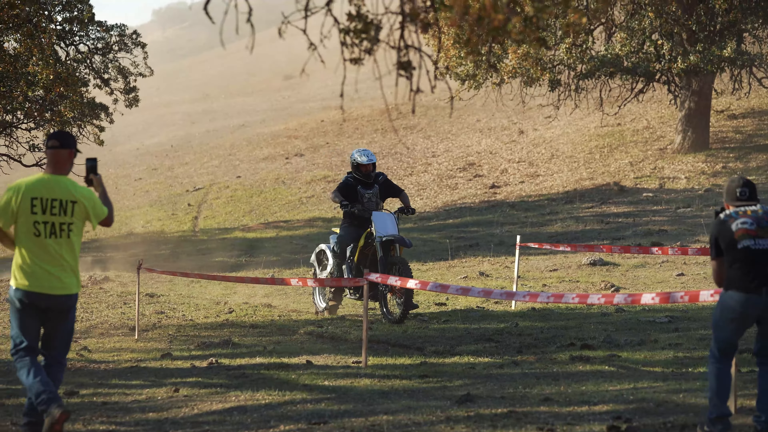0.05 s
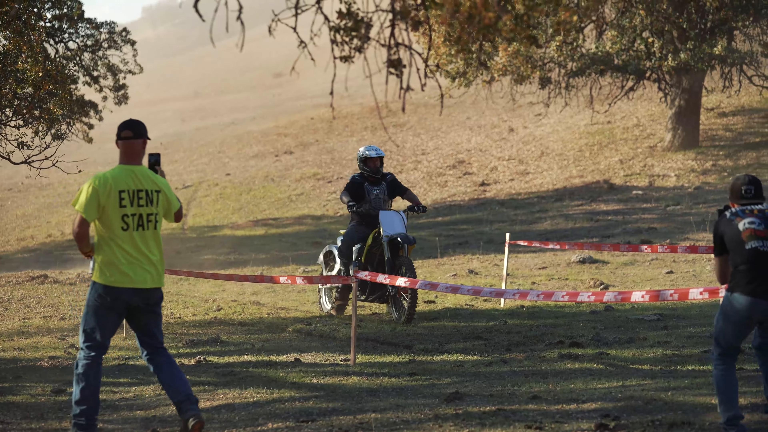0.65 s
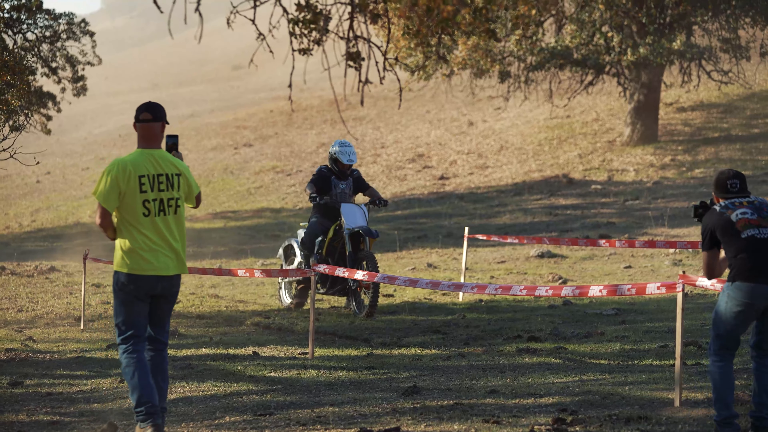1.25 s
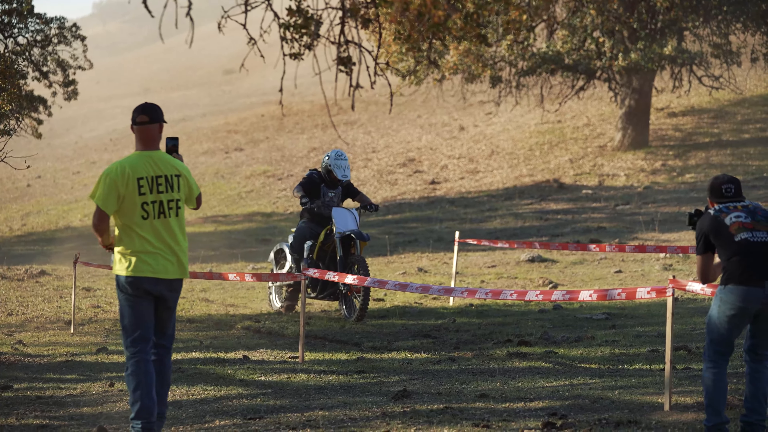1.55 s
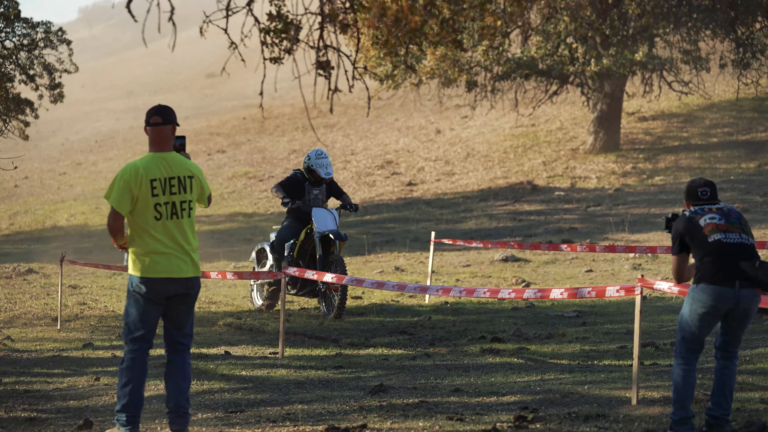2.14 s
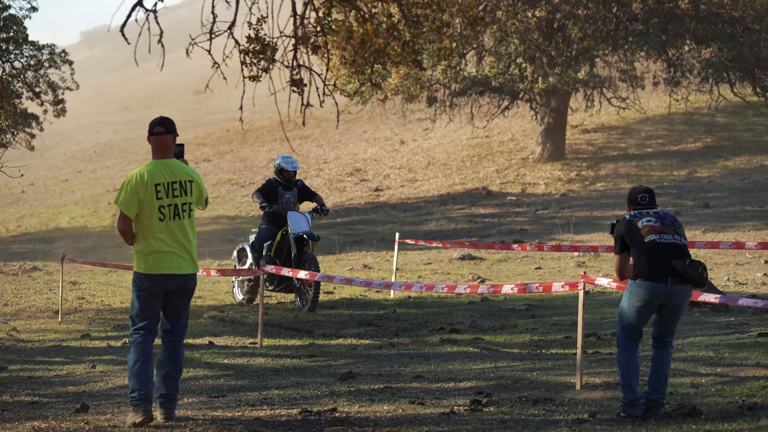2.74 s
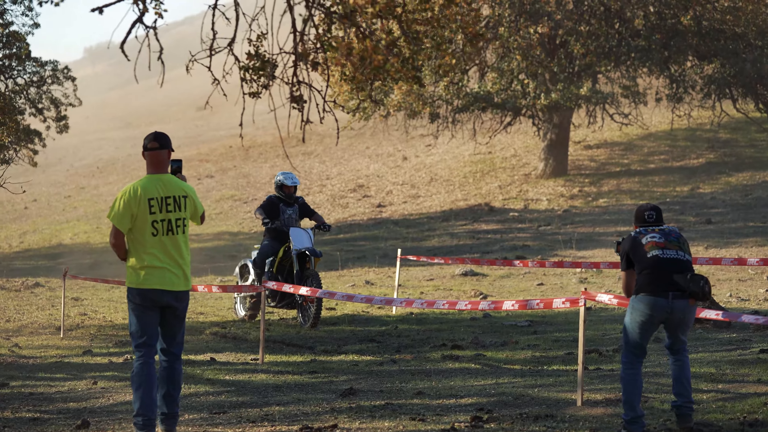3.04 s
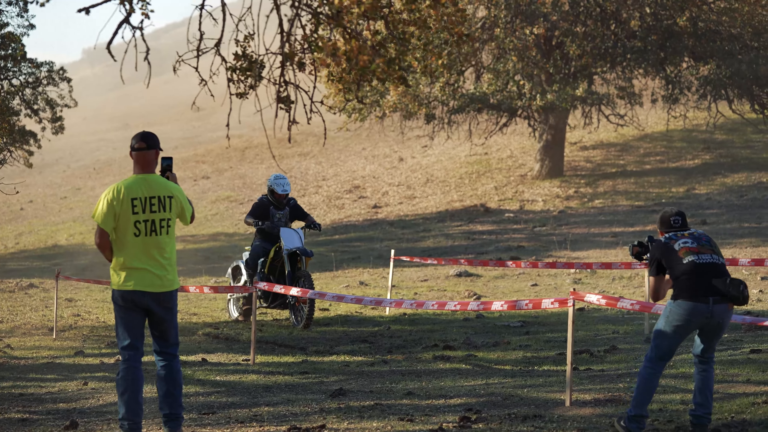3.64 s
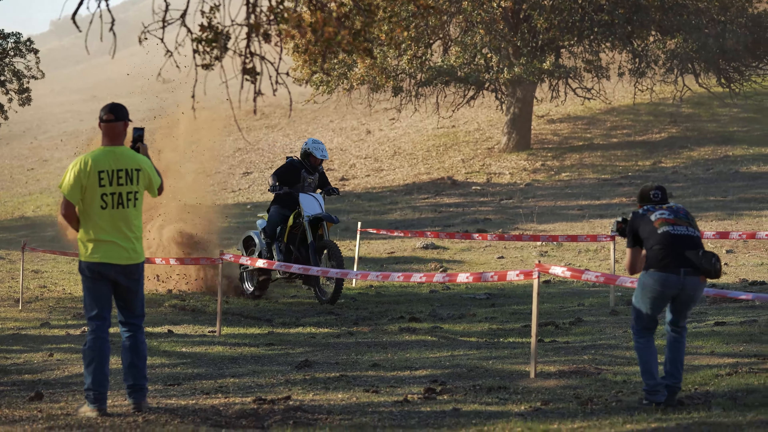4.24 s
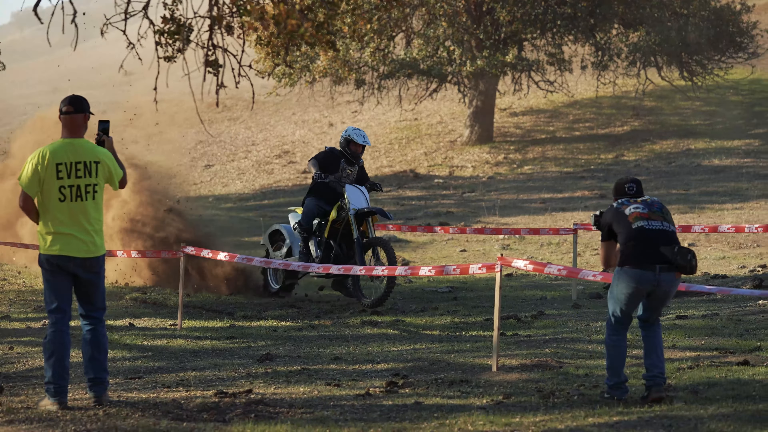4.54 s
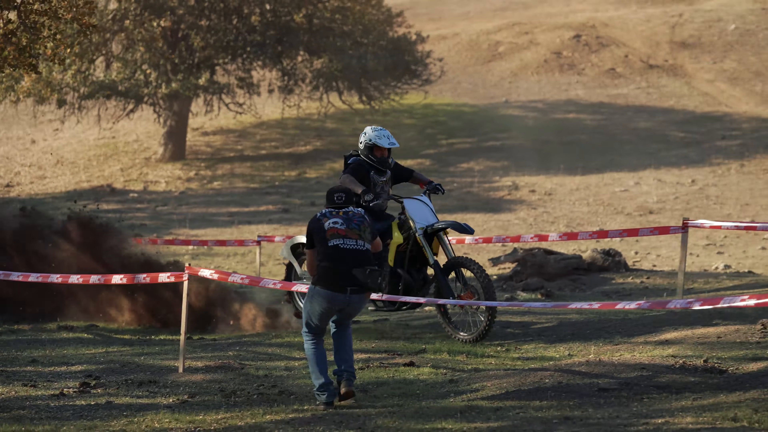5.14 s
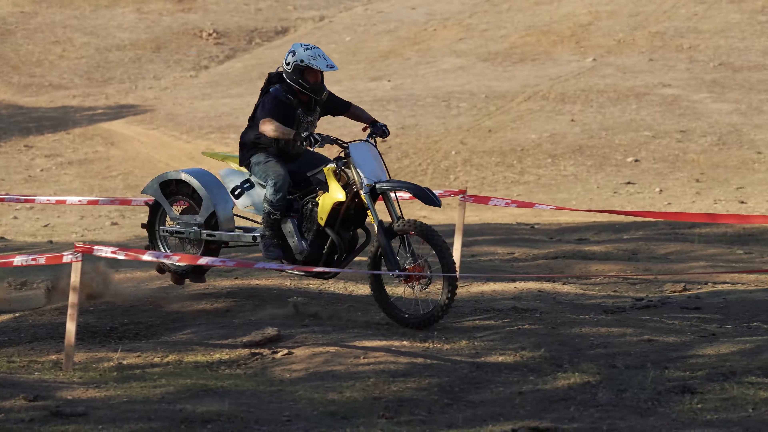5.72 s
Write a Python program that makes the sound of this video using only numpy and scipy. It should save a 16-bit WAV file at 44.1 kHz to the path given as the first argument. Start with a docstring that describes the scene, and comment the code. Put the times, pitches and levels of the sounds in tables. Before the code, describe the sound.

An off-road motorcycle putters outdoors, gives two quick revs, accelerates with a harsh blare and hiss of dirt, then slows nearby.

```python
"""A four-cylinder hill-climb motorcycle idles unevenly on an open hillside, its exhaust droning and puttering.
Two quick twists of the throttle rev it up: each firing blares and cracks out of the open pipe,
and unburnt fuel pops as it slows. Then it launches at full throttle, the rear wheel spinning
and spraying dirt. Last, the throttle shuts and it coasts up close, clattering and popping.
Ground and trees scatter the sound all along."""
import sys
import numpy as np
from scipy import signal
from scipy.fft import rfft, irfft
from scipy.io import wavfile
from scipy.ndimage import uniform_filter1d, map_coordinates

SR = 44100
rng = np.random.default_rng(int(sys.argv[2]) if len(sys.argv) > 2 else 0)


def dump_mix(stems):
    """Bounce the given channels to the path in sys.argv[1] as a 16-bit WAV at rate SR."""
    frames = np.atleast_2d(stems).T  # one column per channel
    limited = np.clip(frames, -1, 1)  # hard clip at full scale
    pcm = np.round(limited * 32767).astype(np.int16)
    wavfile.write(sys.argv[1], SR, pcm)


N = 259308
TIME = np.arange(N) / SR


def gain_of(db):
    """Turns decibels into a number to multiply by."""
    return 10 ** (np.asarray(db) / 20)


def curves(table, at=TIME):
    """Looks up `at` in a table's first column and gives a curve for each other column."""
    key, *columns = np.transpose(table)
    return np.array([np.interp(at, key, column) for column in columns])


def at_pitch(table, hz):
    """Looks up frequencies in a table, joining its rows on a log axis."""
    f, value = np.transpose(table)
    return np.interp(np.log(hz + 1), np.log(f + 1), value)


def steadied(x, size=2600):
    """Holds the average level at 1 and leaves the fast detail alone."""
    power = np.atleast_2d(x ** 2).mean(0)
    return x / np.sqrt(abs(uniform_filter1d(uniform_filter1d(power, size), size)) + 1e-14)


def wobble(rate_hz):
    """A random wavy line, typically about 1 away from zero."""
    count = N // 8
    return np.interp(TIME * rate_hz, np.arange(count), rng.standard_normal(count)) / np.sqrt(2 / 3)


def clicks(times, sizes):
    """Clean clicks at exact times, even between samples."""
    place = np.asarray(times)[:, None] * SR
    at = np.floor(place).astype(int) + np.arange(-7, 9)
    shape = np.sinc(at - place) * np.cos(np.pi * (at - place) / 16) ** 2
    return np.bincount(np.clip(at, 0, N - 1).ravel(), (shape * sizes[:, None]).ravel(), N)


def puffs(times, sizes, decay_s):
    """A burst of swirling gas after each pulse, with as much energy as the pulse."""
    keep = np.exp(-2 / (decay_s * SR))
    energy = np.bincount(np.clip(times * SR, 0, N - 1).astype(int), sizes ** 2, N)
    return np.sqrt(signal.lfilter([1 - keep], [1, -keep], energy)) * rng.standard_normal(N)


def resonate(x, hz, width_hz):
    """Lets through a band of sound around the moving pitch hz."""
    spin = np.exp(2j * np.pi * np.cumsum(hz) / SR)
    keep = np.exp(-np.pi * width_hz / SR)
    return 2 * (spin * signal.lfilter([1 - keep], [1, -keep], x / spin)).real


# narrow bands that the pipe boosts or cuts: f/Hz, width/Hz, boost/dB
PIPE_RINGS = [(1038.8, 64, 3.5), (1187, 23, 3.5), (1413, 88, -3), (1834, 220, 1), (1979, 156, 3),
              (2204, 110, -1), (2382.5, 113, 3.5), (2750, 160, 0), (3344, 235, 3.5), (3871, 154, -5),
              (4296, 252, 5.5), (4525, 198, -12), (4788, 360, 5), (5696, 158, 1.5), (6260, 130, 1.5),
              (6678, 200, 6.5), (6856, 184, -8), (7238, 218, 3.5), (7490, 160, -3.5)]
# their drift as the gas heats and cools: t/s, pitch change/share
PIPE_DRIFT = [(0, -0.014), (1.4, -0.0156), (1.58, 0.0256), (2.2, -0.0012), (2.8, 0.0166), (3.1, -0.0013),
              (3.7, 0.0087), (4.3, -0.00039), (5.2, 0.0056), (5.88, -0.00046)]
def pipe(x, colour, size=4096):
    """The exhaust pipe gives a sound a broad tone colour and narrow, drifting rings."""
    hz = abs(np.fft.fftfreq(size, 1 / SR))
    rings_db = sum(boost / (1 + (2 * (hz - f) / width) ** 2) for f, width, boost in PIPE_RINGS)
    log_gain = np.log(gain_of(at_pitch(colour, hz) + rings_db))
    response = np.fft.ifft(np.exp(signal.hilbert(log_gain).conj())).real  # rings only after a pulse
    clock = np.cumsum(1 + curves(PIPE_DRIFT)[0])  # stretching time moves all the rings together
    stretched = map_coordinates(x, [np.interp(np.arange(clock[-1]), clock, np.arange(N))], order=3)
    return map_coordinates(signal.oaconvolve(stretched, response[:size // 2]), [clock], order=3)


# how long echoes take to fade by 60 dB (below zero they grow): f/Hz, t/s
ECHO_FADE = [(200, -1.94), (2000, 4), (6000, 0.4446), (14000, -0.47)]
# tone colour of the echoes: f/Hz, level/dB
ECHO_COLOUR = [(100, -14), (500, -10.5), (1000, -8.5), (2000, -8.5), (4000, -3.5), (8000, -2.5),
               (14000, -5)]
def hillside(x, wet_db):
    """Adds a short spray of echoes from ground and trees, different at each ear."""
    count, gap = 600, 25  # echoes, and samples between them
    taps = np.zeros((2, SR // 2))
    at = gap + gap * np.arange(count) + rng.integers(0, gap, (2, count))
    np.put_along_axis(taps, at, rng.choice([-1., 1.], at.shape), 1)
    hz, t, bands = signal.stft(taps, SR, nperseg=256)
    decay = gain_of(-60 * t / at_pitch(ECHO_FADE, hz)[:, None])
    decay /= np.sqrt((decay ** 2).sum(1, keepdims=True) * 128 / gap)
    colour = gain_of(at_pitch(ECHO_COLOUR, hz) + wet_db)[:, None]
    tail = signal.istft(bands * decay * colour, SR, nperseg=256)[1]
    return x + signal.fftconvolve(x[None], tail, axes=1)[:, :N]


# engine speed through idle, two revs, launch, wheelspin and coasting: t/s, crank speed/Hz
CRANK_SPEED = [(0, 55.66), (.8, 60.16), (1.42, 57.97), (1.45, 73.9), (1.5, 98.3), (1.58, 158.1),
               (1.62, 138.7), (1.8, 111.77), (2.0, 79.9), (2.2, 64.7), (2.4, 60.4), (2.65, 60.47),
               (2.985, 60.2), (3.04, 73.1), (3.115, 88.3), (3.18, 79.3), (3.305, 69.6), (3.4, 98.25),
               (3.5, 121.8), (3.7, 156.3), (3.77, 167.2), (3.84, 112.5), (3.868, 94.1), (3.92, 105.6),
               (4.03, 119.8), (4.1, 134.7), (4.2, 143.9), (4.3, 148), (4.39, 152.2), (4.44, 160),
               (4.51, 140.6), (4.6, 152.7), (4.63, 143), (4.72, 151.2), (4.79, 171.2), (4.83, 147.2),
               (4.89, 156.3), (4.93, 144.2), (5.0, 155.9), (5.05, 134.7), (5.09, 144.5), (5.17, 154),
               (5.21, 133.2), (5.255, 111), (5.315, 109.2), (5.5, 86.4), (5.6, 74.24), (5.68, 72),
               (5.88, 65.73)]
# the rider's hand: t/s, throttle opening/0-1
THROTTLE_OPENING = [(1.42, 0.18), (1.455, 0.72), (1.55, 1), (1.6, 0), (2.97, 0.18), (3.02, 0.5),
                    (3.115, 0.5), (3.14, 0.04), (3.31, 0.07), (3.34, 0.58), (3.62, 0.6), (3.7, 0.69),
                    (3.87, 0.83), (3.95, 0.93), (5.18, 0.99), (5.26, 0.03)]
def engine(flutter=.004):
    """Speed, throttle and turns so far of the crank, the main shaft, which never spins quite evenly."""
    crank_hz = curves(CRANK_SPEED)[0]
    throttle = np.clip(curves(THROTTLE_OPENING)[0], 0, 1)
    turns = np.cumsum(crank_hz * (1 + flutter * wobble(rate_hz=59.99))) / SR
    return crank_hz, throttle, turns


def nearness(nearest_s=5.946, width_s=0.167):
    """How near a passing thing is, 0-1; the bike unless other times are given."""
    return 1 / (1 + ((TIME - nearest_s) / width_s) ** 2)


def by_throttle(throttle, shut, half, wide):
    """Blends the values for a shut, half open and wide open throttle."""
    past_half = 2 * throttle - 1
    return half + (shut - half) * np.maximum(-past_half, 0) + (wide - half) * np.maximum(past_half, 0)


# base loudness with the throttle shut, half open (a hollower sound) and wide open:
# crank speed/Hz, firing tone/dB, burble/dB, blare/dB, crack/dB, rush/dB
SHUT_LEVELS = [(59.4, -27, -38.5, -48.5, -61, -74.5), (61.68, -30, -33, -49.5, -57, -67.5),
               (71.29, -26, -30.5, -36, -47.5, -57.5), (72.24, -29, -27, -36, -38, -53.5),
               (80.303, -28, -30.5, -33.5, -36.5, -48), (96.3, -26.5, -32.5, -37.5, -39, -53.5),
               (103.35, -26.5, -30.5, -36, -42, -56.5), (129.9, -22.5, -37, -25.5, -28.5, -45.5)]
HALF_LEVELS = [(64.6, -22.5, -27.5, -43, -55.5, -63), (76.26, -26, -27.5, -33.5, -36.5, -55.5),
               (86.6, -34, -25.5, -35, -44, -59.5), (95.68, -47, -33.5, -34, -33, -47),
               (115.8, -36.5, -37, -29.5, -36, -48), (130.4, -37, -33.5, -27.5, -23, -38.5),
               (143.4, -46.5, -32, -26.5, -24.5, -40.5), (160.1, -21.5, -43.5, -29.5, -25.5, -42)]
WIDE_LEVELS = [(65.77, -19.5, -25.5, -21.5, -30, -60.5), (101, -23.5, -23, -24, -19, -39),
               (125.7, -22, -34.5, -25, -23, -41.5), (153.9, -22, -38, -22.5, -25, -39.5)]
# what nearness adds to the same five voices: boost/dB
NEAR_BOOST = (8.44, 7, 5.3, 1.6, 9.9)
def loudness(crank_hz, throttle):
    """Levels in dB of the five voices, from speed, throttle and nearness."""
    at_speed = [curves(table, crank_hz) for table in (SHUT_LEVELS, HALF_LEVELS, WIDE_LEVELS)]
    levels = by_throttle(throttle, *at_speed) + np.outer(NEAR_BOOST, nearness())
    levels[-1] += 4 * nearness(nearest_s=5.23, width_s=0.46)  # passing dirt lifts the rush
    return levels


# at low speed one burn every few turns is heavy: t/s, swell of the firing tone/share, chuff level/dB
HEAVY_BURNS = [(.067, 1.6, -9), (.129, 1.55, -8), (.203, 1.45, -10), (.269, 1.6, -9.5), (.334, 1.7, -22.5),
               (.378, 1.44, -19), (.443, 0.94, -15.5), (.51, 1.06, -10.5), (.574, 0.98, -9.5),
               (.641, 1.17, -12), (0.706, 0.78, -11), (.774, 1.06, -13), (.845, 0.86, -5.5),
               (.913, 0.95, -8), (.952, 0.86, -20.5), (1.042, 1.14, -11), (1.11, 1.04, -9.5),
               (1.177, 0.86, -10.5), (1.249, 0.77, -8.5), (1.312, 1.04, -12.5), (1.357, 0.94, -15),
               (2.02, 0.49, -3.5), (2.109, 1.305, -7), (2.181, 2.05, -8.5), (2.239, 2.215, -25),
               (2.302, 2.7, -10.5), (2.37, 2, -10.5), (2.443, 0.991, -11), (2.492, 2.1, -18),
               (2.539, 1.34, -19.5), (2.608, 1, -19.5), (2.675, 0.96, -15.5), (2.744, 1.003, -20.5),
               (2.811, 0.849, -18.5), (2.868, 1.002, -11.5), (3.0, 0.7017, -16.5), (5.567, 1.27, -10),
               (5.606, 0.872, -8), (5.64, 0.814, -10.5), (5.669, 1.65, -15), (5.728, 0.88, -17.5),
               (5.791, 1.803, 0.5), (5.868, 1.274, -22)]
def lope(after_s, width_s):
    """The limping beat of the idle: a smooth bump after_s from each heavy burn."""
    t = TIME[::32]
    bumps = sum(swell * np.exp(-((t - s - after_s) / width_s) ** 2 / 2) for s, swell, _ in HEAVY_BURNS)
    return np.interp(TIME, t, bumps)


def lope_gain(db, after_s, width_s):
    """Changes a level by up to db around each heavy burn."""
    return gain_of(db * np.minimum(lope(after_s, width_s), 1))


def tone(turns, order, db, waver_db=3.0):
    """A wavering tone; its order is how many times it swings in one crank turn."""
    level = gain_of(db + waver_db * wobble(45))
    return level * np.sqrt(2) * np.cos(2 * np.pi * (order * turns + rng.random()))


# low pitches at which the pipe likes to ring: f/Hz, level/dB
LOW_RINGS = [(58, -47), (72, -44.5), (81, -35.5), (98, -32), (112, -40), (130, -46), (180, -33.5),
             (240, -38), (275, -30.5), (315, -24.5), (355, -28.5), (415, -37), (560, -45.5)]
# boosts for orders 1, 3 and 4, by throttle: shut/dB, half/dB, wide/dB
ORDER_BOOSTS = [(.5, 0, -1.4), (-9.5, 2, -0.075), (-1.5, 5, 1)]
def drone(turns, crank_hz, throttle, firing_db):
    """The firing tone swells at heavy burns; weaker tones swell as they cross the pipe's low rings."""
    cold_hz = crank_hz / (1 + 0.1108 * np.minimum(2 * throttle, 1))  # hot gas raises the rings
    first, third, fourth = [at_pitch(LOW_RINGS, k * cold_hz) + by_throttle(throttle, *db)
                            for k, db in zip((1, 3, 4), ORDER_BOOSTS)]
    near_db = 3 * nearness()
    levels = first, firing_db, third + near_db, fourth + near_db
    tones = [tone(turns, k, db, waver_db=1.2736) for k, db in enumerate(levels, 1)]
    tones[1] *= steadied(1 + lope(after_s=0, width_s=0.0087), size=4000)
    return sum(tones)


# the four cylinders in firing order: relative level/dB, extra travel time in the pipe/s
FIRING_ORDER = [(0, 0.0003), (-3.5, 0), (-0.5, 0), (-4.5, 0.00147)]
def firings(turns, contrast, spread_db, jitter_s):
    """Times and strengths of the firings, two a crank turn; no two burns are alike."""
    number = np.arange(int(2 * turns[-1]))
    time_luck, size_luck = rng.standard_normal((N // 100, 2))[number].T
    cylinder_db, lag_s = np.take(FIRING_ORDER, number, axis=0, mode="wrap").T
    times = np.interp(number / 2, turns, TIME) + lag_s + jitter_s * time_luck
    return times, gain_of(contrast * cylinder_db + spread_db * np.minimum(size_luck, 2))


# tone colour of the burble: f/Hz, level/dB
BURBLE_COLOUR = [(25, -19), (60, -16), (90, 4.5), (140, -2), (190, -6.5), (250, -5.5), (340, 4.5),
                 (470, -1), (600, -16.5), (900, -18.5), (2000, -53)]
def burble(turns, crank_hz, level_db, suction=0.612, gas=.17, width_s=0.000978):
    """Strong and weak slugs of gas, each followed by suction, thump the pipe's low rings."""
    times, sizes = firings(turns, contrast=0.45, spread_db=.7, jitter_s=.0001)
    uneven = sizes - sizes.mean()
    rebound = times + 0.1423 / np.interp(times, TIME, crank_hz)
    flow = clicks(times, uneven) - suction * clicks(rebound, uneven) + gas * puffs(times, uneven, 0.0059)
    keep = np.exp(-1 / (width_s * SR))
    slugs = signal.lfilter([1 - keep], [1, -keep], flow)
    slugs *= lope_gain(db=-1, after_s=-0.041, width_s=0.014)  # a gulp just before a heavy burn
    return gain_of(level_db) * steadied(hillside(pipe(slugs, BURBLE_COLOUR), wet_db=5.5), size=1600)


def overtones(turns, crank_hz, burble_db, blare_db, load):
    """Higher tones hum low in the pipe at idle and sing raggedly under load; a gear whines thinly."""
    hum = sum(tone(turns + rng.random(), k, burble_db - 15 + at_pitch(BURBLE_COLOUR, k * crank_hz))
              for k in range(5, 12))
    song = 0
    for k in range(5, 21):
        ragged_turns = turns + rng.random() + .55 * wobble(110) / k
        song += tone(ragged_turns, k, blare_db - 4 * (k % 2), waver_db=1.8)  # odd orders are weaker
    whine = tone(turns, order=11, db=-57.5)
    return hum + whine + gain_of(-11) * load ** 2 * brassy(song, width_hz=380)


# tone colour of the blare: f/Hz, level/dB
BLARE_COLOUR = [(300, -47.5), (480, -1.5), (620, -3), (750, -3.5), (900, -7), (1100, -5.5), (1400, -5.5),
                (1750, 2), (2200, -4), (2700, -2.5), (3400, -7), (4500, -22.5), (8000, -32)]
# a bright band that wanders as the bike slides about: t/s, f/Hz, amount added/share
BRIGHT_BAND = [(0, 1030, .5), (.5, 1030, 0.35), (.8, 1950, 0.88), (1.4, 1930, 0.22), (1.54, 1940, 1.05),
               (1.6, 2852, 0.8), (1.7, 2850, 0.44), (2.0, 2010, 0.107), (3.6, 1889, 0.5175),
               (3.78, 3269, 0.324), (3.93, 3307, 0.87), (4.1, 2000, 0.19), (4.35, 2838, 1.4),
               (4.45, 1850, 0.625), (4.6, 1770, 0.705), (4.95, 1712, 0.5966), (5.05, 2518, 1.364),
               (5.2, 2481, 0.38), (5.3, 1902, 0.339)]
# boost or cut of the middle pitches: t/s, level/dB
MIDDLE_BAND = [(0, -7), (.5, 5), (.75, -9.5), (1.2, -14), (1.55, 1.5), (2.5, 8), (3.2, 5.5), (3.9, 4.5),
               (4.2, -3), (4.5, -0.5), (4.8, 2), (5.2, 5), (5.88, 20)]
def brassy(x, width_hz):
    """The pipe's horn-like colour, with a wandering bright band and a changing middle."""
    bright_hz, share = curves(BRIGHT_BAND)
    voice = pipe(x, BLARE_COLOUR)
    middle = (gain_of(curves(MIDDLE_BAND)[0]) - 1) * resonate(voice, hz=np.full(N, 1062), width_hz=724)
    return voice + middle + share * resonate(voice, bright_hz, width_hz)


def blare(turns, level_db, load):
    """The brassy voice of the pipe: loose puffing at idle, firm and ragged pulses under load."""
    times, sizes = firings(turns, contrast=.9, spread_db=2.5, jitter_s=.00003)
    gas = (2.2 * (1 - load) + .42 * load) * puffs(times, sizes, decay_s=.005)
    swell = lope_gain(db=3, after_s=0.0239, width_s=0.016)
    voice = brassy((clicks(times, sizes) + gas) * swell, width_hz=910)
    return gain_of(level_db - 2.5) * steadied(hillside(voice, wet_db=2.5))


# tone colour of the crack: f/Hz, level/dB
CRACK_COLOUR = [(500, -56.5), (1400, -2), (2000, 0), (3400, 3), (4600, 0), (6000, -4), (7300, -6.5),
                (8200, -17), (11000, -41.5), (16000, -61.5)]
def crack(turns, level_db, load):
    """The front of each pulse steepens into a small shock, the strongest burns most of all."""
    times, sizes = firings(turns, contrast=0.5, spread_db=0.5, jitter_s=.00003)
    gas = (1.3 * (1 - load) + .55 * load) * puffs(times, sizes, decay_s=.004)
    swell = lope_gain(db=4.68, after_s=0.0239, width_s=0.0062)
    shocks = pipe((clicks(times, sizes) + gas) * swell, CRACK_COLOUR)
    return gain_of(level_db + 2) * steadied(hillside(shocks, wet_db=2))


# tone colour of the rush: f/Hz, level/dB
RUSH_COLOUR = [(3000, -23.5), (6500, -0.5), (8500, -3), (11000, -3.5), (13000, -12.5), (16000, -10.5)]
def rush(level_db, grain_db=1.5):
    """Grainy hiss of the gas jet and of dirt thrown by the rear wheel."""
    hiss = rng.standard_normal(N) * gain_of(grain_db * wobble(700))
    return gain_of(level_db + 5.5) * steadied(hillside(pipe(hiss, RUSH_COLOUR), wet_db=-5.5))


# loudness of the clatter: t/s, level/dB
CLATTER_LEVEL = [(0, -47), (.5, -53.5), (.8, -49.5), (4.6, -52.5), (5.14, -34.5), (5.215, -19), (5.28, -38),
                 (5.5, -35), (5.65, -29.5), (5.88, -34.5)]
# its hollow tone colour: f/Hz, level/dB
KNOCK_COLOUR = [(300, -22), (520, -2), (700, -9.5), (850, -7), (1020, -6), (1250, -9.5), (1800, -6.5),
                (5000, -36)]
def clatter(grain_db=5):
    """Chain and frame knock loosely, loudest in the lurch as the throttle snaps shut at the end."""
    knocks = rng.standard_normal(N) * gain_of(grain_db * wobble(160))
    return gain_of(curves(CLATTER_LEVEL)[0]) * steadied(hillside(pipe(knocks, KNOCK_COLOUR), wet_db=1.5))


# loudness of the faint ring: t/s, level/dB
FAINT_RING_LEVEL = [(0, -49.5), (.2, -55), (.35, -61.5), (.47, -48.5), (.6, -56.5), (1.2, -89.5)]
def faint_ring(pitch_hz=1020, width_hz=36):
    """A narrow, fuzzy tone that fades out early in the idle."""
    hz = np.full(N, pitch_hz)
    ring = resonate(resonate(rng.standard_normal(N), hz, width_hz), hz, 2 * width_hz)
    return gain_of(curves(FAINT_RING_LEVEL)[0]) * steadied(hillside(ring, wet_db=3))


# tone colour of the open air: f/Hz, level/dB
AIR_COLOUR = [(20, -1), (60, -10.5), (200, 7.5), (1000, -21.5), (4000, -24.5), (12000, -54)]
def air(level_db=-45.5):
    """Faint rumble of the open hillside."""
    colour = gain_of(at_pitch(AIR_COLOUR, np.fft.rfftfreq(N, 1 / SR)))
    noise = irfft(rfft(rng.standard_normal(N)) * colour, N)
    return gain_of(level_db) * noise / noise.std()


# tone colour of a chuff: f/Hz, level/dB
CHUFF_COLOUR = [(500, -30.5), (1300, -6), (1850, 3.5), (2400, 0.5), (3300, -2), (7000, -17), (16000, -42)]
def chuffs(after_s=.011, decay_s=0.0167, tick=0.2):
    """Each heavy burn leaves the pipe as a tick and a short gust of gas: the putter of the idle."""
    times, _, db = np.transpose(HEAVY_BURNS)
    gusts = tick * clicks(times + after_s, gain_of(db)) + puffs(times + after_s, gain_of(db), decay_s)
    return hillside(pipe(gusts, CHUFF_COLOUR), wet_db=-7.5)


# pops, mostly as the engine slows or the throttle opens: t/s, relative level/dB, f/Hz
FUEL_POPS = [(.0845, -35, 4500), (.2838, -37, 4000), (.5876, -37, 4000), (.722, -39.5, 4500),
             (.856, -37.5, 4500), (.929, -35, 5000), (.954, -32.5, 5500), (1.2664, -37, 5000),
             (1.360, -34.5, 5000), (1.437, -22.5, 3500), (1.948, -15, 5460), (1.971, -15.5, 5000),
             (1.985, -15, 2798), (1.996, -13.5, 5470), (2.0215, -13.5, 5466), (2.047, -14.5, 5498),
             (2.074, -14, 5500), (2.088, -18, 2802), (2.115, -21.5, 3000), (2.128, -19.5, 5500),
             (2.1873, -27.5, 4899), (2.2265, -24.5, 4500), (3.0483, -18, 3496), (3.098, -21, 3441),
             (3.157, -17, 5500), (3.186, -15, 5500), (3.2126, -12.5, 5500), (3.226, -13.5, 2797),
             (3.2386, -11.5, 5500), (3.2654, -14, 5500), (3.280, -14.5, 2799), (3.329, -27, 4000),
             (3.377, -13.5, 5004), (3.399, -13.5, 5000), (3.470, -11.5, 4994), (3.487, -10, 5000),
             (3.504, -10, 5000), (3.512, -8.5, 5003), (3.527, -6.5, 5000), (5.5194, -18.5, 5498),
             (5.533, -20.5, 6231), (5.544, -16, 6194), (5.569, -17.5, 6010), (5.582, -17.5, 5520),
             (5.594, -17, 6010), (5.620, -16, 4501), (5.646, -17, 4500), (5.710, -18.5, 2501),
             (5.7717, -18.5, 4487), (5.801, -18, 4000), (5.817, -18, 3019)]
# tone colour of a pop: f/Hz, level/dB
POP_COLOUR = [(400, -33), (1400, 1), (2000, -2.5), (3400, -1.5), (5000, -1), (7300, -2.5), (8200, -8),
              (11000, -20), (16000, -43)]
def pops():
    """Unburnt fuel catches fire in the hot pipe with sharp snaps, some bright and some dull."""
    times, db, hz = np.transpose(FUEL_POPS)
    snaps = clicks(times + 0.0005, gain_of(db)) + .8 * puffs(times, gain_of(db), decay_s=.003)
    snaps = resonate(snaps, np.interp(TIME, times, hz), width_hz=3360)
    return gain_of(13.5) * hillside(pipe(snaps, POP_COLOUR), wet_db=-3)


def scene():
    """One crank and one throttle drive the engine's voices; pops, clatter and air join them."""
    crank_hz, throttle, turns = engine()
    firing_db, burble_db, blare_db, crack_db, rush_db = loudness(crank_hz, throttle)
    firmness = 0.558 + 0.442 * throttle  # pulses turn breathy as the throttle shuts
    load = np.clip((blare_db + 42) / 16, 0, 1) * firmness  # how hard the engine works, 0-1
    tones = drone(turns, crank_hz, throttle, firing_db)
    tones += overtones(turns, crank_hz, burble_db, blare_db, load)
    low = hillside(tones, wet_db=-4) + burble(turns, crank_hz, burble_db)
    high = crack(turns, crack_db, load) + rush(rush_db) + pops() + chuffs()
    high *= gain_of([[-.7], [.7]])  # a little to the right
    return low + blare(turns, blare_db, load) + high + clatter() + faint_ring() + air()


# how far the left microphone opening runs ahead of the right: f/Hz, phase/radians
LEFT_LEAD = [(20, 0), (4400, 0.165), (6400, 1.036), (7200, 1.155), (10000, 1.517), (15000, 1.7)]
def record(dry, ceiling=.7, top_hz=15750):
    """Left and right slip out of step in the treble, peaks are rounded and the very top is cut."""
    phase = at_pitch(LEFT_LEAD, np.fft.rfftfreq(N, 1 / SR))
    heard = irfft(rfft(dry) * np.exp(.5j * np.outer([1, -1], phase)), N)
    rounded = heard / (1 + (heard / ceiling) ** 4) ** (1 / 4)
    lowpass = signal.firwin(511, top_hz, window=("kaiser", 9), fs=SR)
    return signal.oaconvolve(rounded, lowpass[None], "same")


dry = scene()
out = record(dry)
dump_mix(out)
```